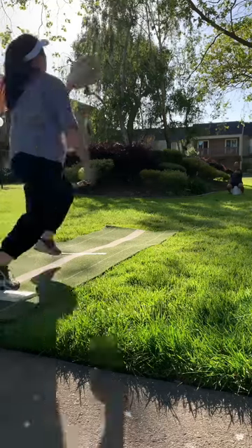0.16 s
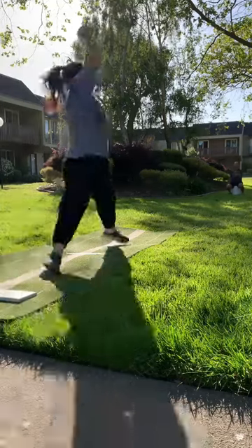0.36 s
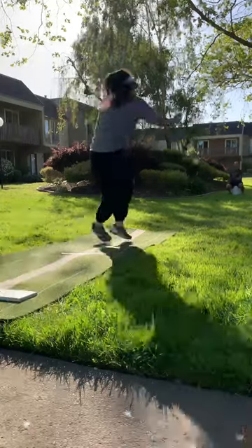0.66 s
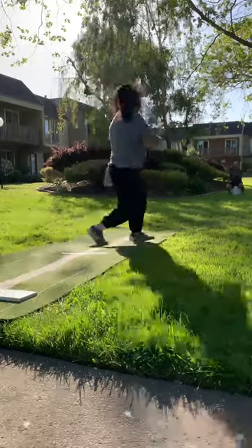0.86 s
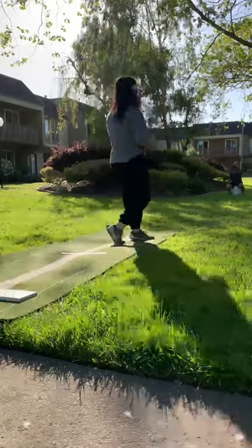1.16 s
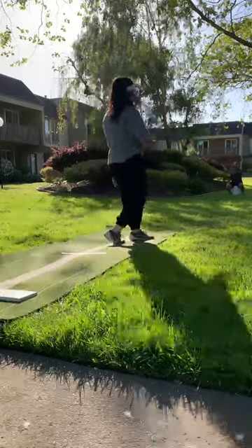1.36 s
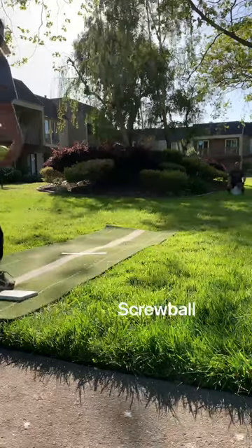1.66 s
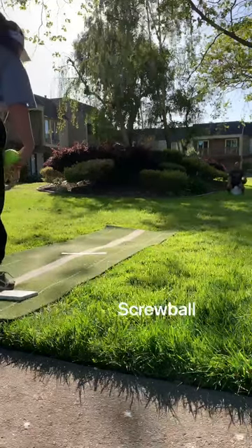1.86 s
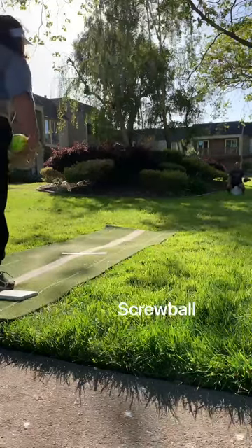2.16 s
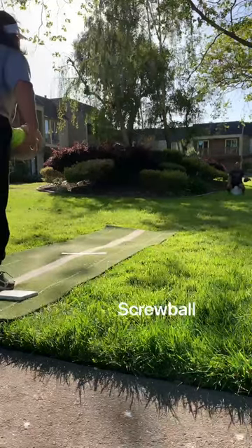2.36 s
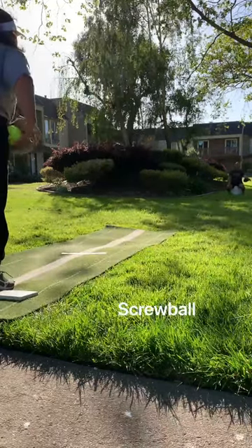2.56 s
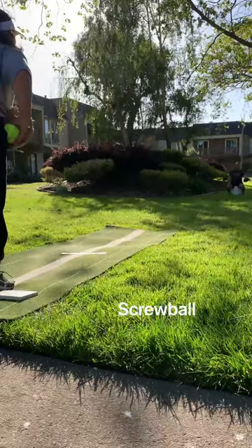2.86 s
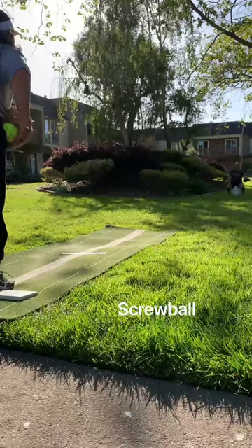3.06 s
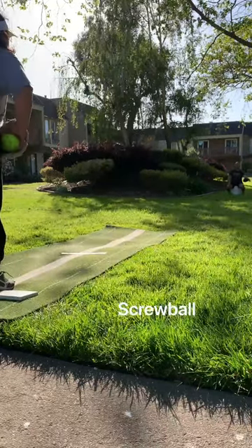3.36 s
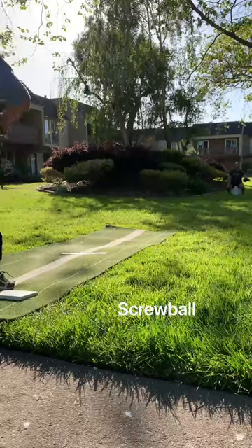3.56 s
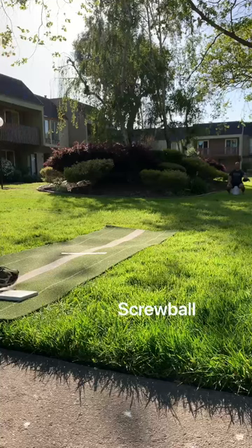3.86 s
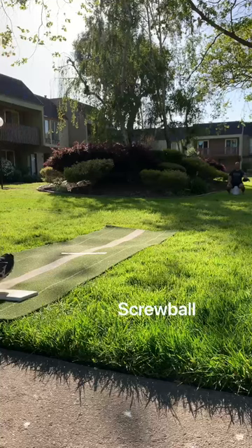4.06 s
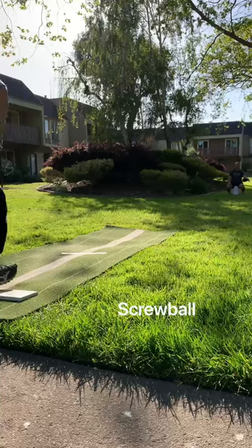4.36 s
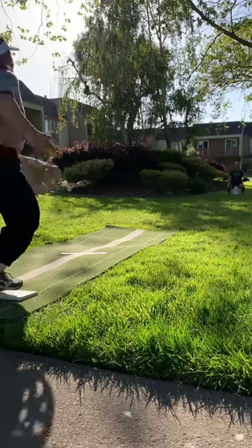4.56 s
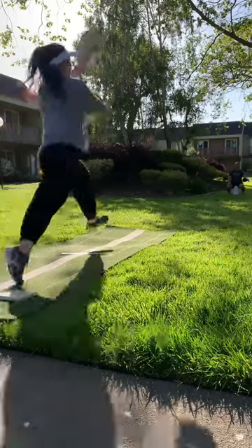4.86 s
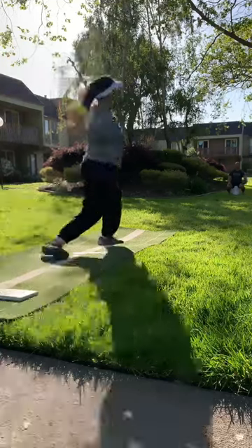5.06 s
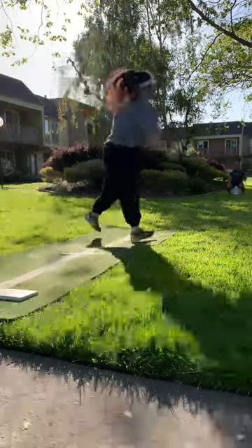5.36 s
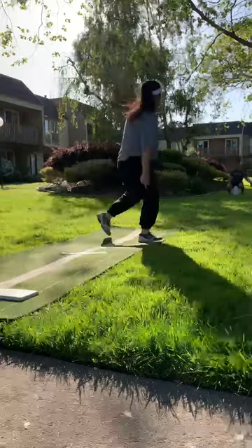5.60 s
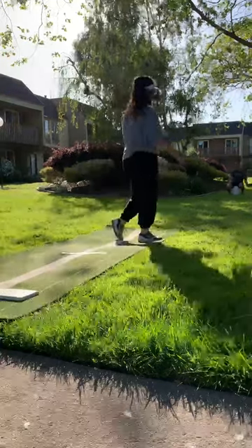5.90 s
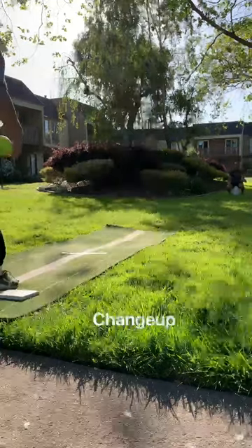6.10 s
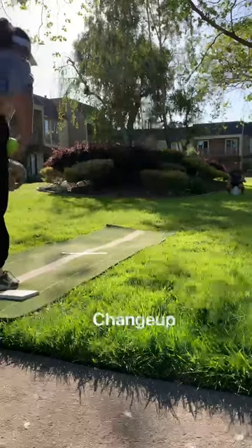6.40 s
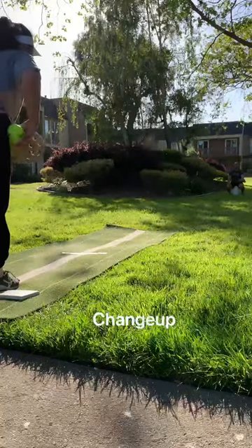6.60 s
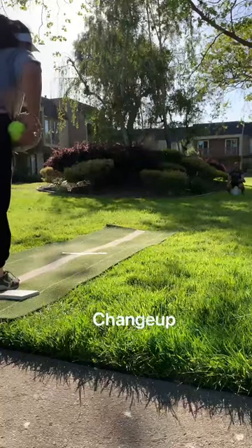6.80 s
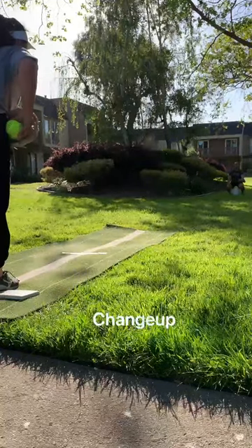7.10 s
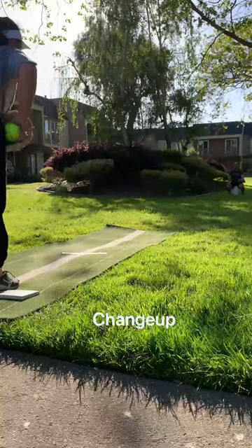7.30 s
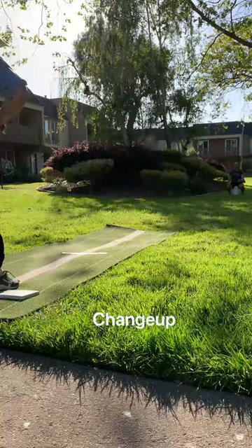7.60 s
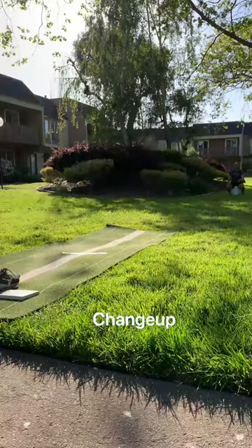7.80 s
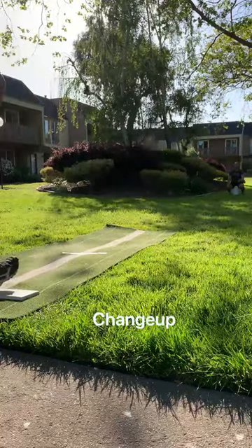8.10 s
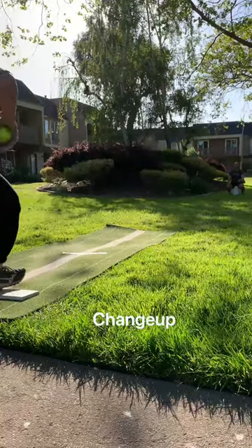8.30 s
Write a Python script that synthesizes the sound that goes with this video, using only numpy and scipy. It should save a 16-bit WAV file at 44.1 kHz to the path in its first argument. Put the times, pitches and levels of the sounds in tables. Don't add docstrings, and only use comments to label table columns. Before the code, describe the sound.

Two softball pitches heard from beside the pitcher. Each has gritty shoe friction on a mat, a fluttery leather-and-cloth slap, then a very loud short pop in a mitt across the yard with a second of scattered echo. Between them come tiny ball and lace crackles over low distant traffic. The ending is quiet: glove rustles, high wavering bird whistles, and a few small sharp ticks just before it stops.

```python
import sys
import numpy as np
from scipy import signal
from scipy.io import wavfile
from scipy.ndimage import uniform_filter1d

SR = 44100
rng = np.random.default_rng(int(sys.argv[2]) if len(sys.argv) > 2 else 0)


def materialize(psi):
    bounded = np.clip(np.atleast_2d(psi).T, -1, 1)
    quanta = np.round(bounded * 32767).astype(np.int16)
    wavfile.write(sys.argv[1], SR, quanta)


def invert_db(level):
    return 10 ** (np.asarray(level, dtype=float) / 20)


N = 372503
TIME = np.arange(N) / SR

SHOTS_S = [0, 1.408, 5.978, 8.5]
# start in seconds, crack level in dB, crack length in ms,
# lateness of the crack's peak (exponent), lag of the air pocket in seconds.
CATCHES = [
    (1.0738, 2.5, 2.7, 1.1, .0032),
    (5.6724, -0.5, 2.5, 2.0, .0031),
]


def rms_one(x):
    return x / np.sqrt(np.mean(x ** 2) + 1e-20)


def at_hz(points, hz):
    curve_hz, values = np.transpose(points)
    return np.interp(np.log(hz), np.log(curve_hz), values)


def drift(rate):
    r = np.exp(-40 * np.pi * rate / SR)
    noise = rng.standard_normal(N // 20 + 2002)
    slow = signal.lfilter([1], [1, -2 * r, r * r], noise)[2000:]
    return np.repeat(rms_one(slow), 20)[:N]


def resonance(x, hz, width_hz):
    r = np.exp(-np.pi * width_hz / SR)
    return signal.lfilter([1, 0, -1], [1, -2 * r * np.cos(2 * np.pi * hz / SR), r * r], x) * (1 - r * r) / 2


def resonance_twice(x, hz, width_hz):
    return resonance(resonance(x, hz, width_hz), hz, width_hz)


def bands(sources, spectrum, order=2):
    edges = 28 * 2 ** np.arange(0, 9.3, .4)
    lowest, highest = spectrum[0][0], spectrum[-1][0]
    inside = [(a, b) for a, b in zip(edges, edges[1:]) if lowest < np.sqrt(a * b) < highest]
    for k, (low, high) in enumerate(inside):
        centre = np.sqrt(low * high)
        sos = signal.butter(order, [low, high], "band", fs=SR, output="sos")
        yield centre, signal.sosfilt(sos, sources[k % 2]) * invert_db(at_hz(spectrum, centre))


def contacts(rows):
    out, t = np.zeros(N + 4000), np.arange(4000) / SR
    for s, peak_db, hz, cycles, ms in rows:
        ms = max(ms, .1)
        burst = rng.standard_normal(4000) * np.exp(-t * 820 / ms) * np.minimum(t * 5e3 / ms + .1, 1)
        rung = resonance_twice(burst, hz, 3.1 * hz / max(cycles, 1))
        click = signal.lfilter(*signal.butter(1, [hz / 2, min(1.1 * hz, 18000)], "band", fs=SR), burst)
        click_share = .3 if hz > 1450 else .07
        hit = rung / np.abs(rung).max() + click_share * click / np.abs(click).max()
        hit = signal.lfilter(*signal.butter(3, min(1.9 * hz, 19000), fs=SR), hit)
        out[round(s * SR):][:4000] += invert_db(peak_db) * hit / np.abs(hit).max()
    return out[:N]


def strokes(rows):
    s, db, rise, fall = np.transpose(rows)[:, :, None]
    coarse = TIME[::32] - s
    away = np.maximum(-coarse / np.maximum(rise, .004), coarse / np.maximum(fall, .004))
    gain = invert_db(db - 20 * away ** 1.36)
    return np.repeat(np.sqrt((gain ** 2).sum(axis=0)), 32)[:N]


def mitt():
    # frequency in Hz, level in dB.
    leather = [
        [(1030, -15.5), (1400, -17), (2050, -5.5), (2500, -0.5), (3400, -9), (4500, -13), (5450, -17.5),
         (7200, -10.5), (8200, -16), (10800, -31.5)],
        [(1060, -24), (2300, -25), (3250, 1), (4100, -4.5), (5400, -5.5), (6900, -9.5), (9000, -20)],
    ]
    # start in seconds, peak in dB, ring in Hz, cycles rung, contact in ms.
    palm = [
        (1.0748, -16.5, 1000, 8.7, 0.6),
        (1.075, -22, 1360, 7.1, 0.85),
        (1.0757, -20, 2400, 5.5, 2.5),
        (1.077, -22.5, 145, 2.2, 8.),
        (5.676, -25.5, 152.9, 2.2, 5.6),
        (5.6746, -22.5, 1090, 4.2, 1.2),
        (5.6752, -22, 3200, 5.5, 2.5),
    ]
    pocket_hz, pocket_db, grit_db = 266, -14, -20
    out, t = contacts(palm), np.arange(1500) / SR
    for (s, crack_db, ms, late_peak, lag), modes in zip(CATCHES, leather):
        share = np.minimum(t * 1e3 / ms, 1)
        contact = np.sin(np.pi * share ** late_peak) ** 2.3
        crack = sum(invert_db(db) * np.sin(2 * np.pi * (hz * t + rng.random())) for hz, db in modes)
        crack = contact * (crack + invert_db(grit_db) * rng.standard_normal(1500))
        late = np.maximum(t - lag, 0)
        turns = pocket_hz * late + .17 * (1 - np.exp(-late / .0015))
        pocket = -np.sin(2 * np.pi * turns) * (late * 300) ** 0.15 * np.exp(-(late * 135) ** 3)
        out[round(s * SR):][:1500] += invert_db(crack_db) * crack / np.abs(crack).max() + invert_db(pocket_db) * pocket
    return out


def thigh_slaps():
    # start in seconds, peak in dB, ring in Hz, cycles rung, contact in ms.
    slap_rows = [(.543, -19.5, 1050, 5.5, 1.1), (.549, -26, 4300, 16, 4.7), (.5528, -17, 2700, 4.1, 1.1),
                 (.55, -24, 8800, 1.5, 4.5), (.5445, -29.5, 9000, 1.5, 6.), (.5675, -28, 6000, 1.5, 3.),
                 (.554, -17.5, 1123, 4.3, 3.7), (.557, -20, 500, 3.3, 6.5), (.566, -20, 1684, 3., 2.4),
                 (.568, -15.5, 330, 2.8, 5.2), (5.124, -29, 4000, 2.63, 30), (5.125, -30, 8000, 1.5, 8.),
                 (5.13, -24.5, 7903, 1.7, 6.), (5.126, -29, 1500, 1.5, 12.), (5.134, -25, 4500, 2.5, 5.),
                 (5.14, -18.5, 3340, 12, 1.3), (5.146, -26, 500, 2.3, 8.), (5.141, -16.5, 1639, 5., 3.1),
                 (5.142, -17.5, 959, 9., 2.5), (5.1475, -18, 940, 5., 2.9), (5.152, -19.5, 110, 1.2, 1.9)]
    return contacts(slap_rows)


def yard(x):
    # frequency in Hz, level in dB per Hz.
    scatter = [(71, -32.5), (120, -7), (177, -5.5), (250, -1.5), (563, -13), (846, -6), (1830, -17),
               (2750, -14.5), (3170, -15.5), (4760, -16.5), (7160, -16.5), (16000, -29)]
    # frequency in Hz, time to die by 60 dB in seconds.
    t60 = [(150, 1.3), (500, 0.94), (1200, 1.4), (3000, 1.1), (6000, 0.72), (8500, .36), (13000, .25)]
    # delay in seconds, dB in first shot, dB in second shot, band in Hz.
    walls = [(.011, 2, 2.5, 299), (0.016, -1.5, -2, 450), (.021, 1.5, -6, 270), (0.0216, -14.5, -4, 902.4),
             (.025, -1.5, -6.5, 1029), (.03, -14, -5.5, 897), (.072, -5, -6, 298), (.14, -7, -11, 250),
             (0.053, -4, 5, 870), (0.065, -1, -10, 2870), (0.068, -8, -0.5, 4500), (0.08, -8, -2, 840),
             (0.102, -7, -9, 990), (.143, -8, -10.5, 1380), (0.198, -16, -34, 1340),
             (0.251, -12.5, -12.5, 1300), (.252, -14.5, -24, 2530)]
    bright_db = [2.5, 1.5]
    t, out = np.arange(SR) / SR, np.zeros(N)
    for shot, (start, end) in enumerate(zip(SHOTS_S[:2], SHOTS_S[1:])):
        white = rng.standard_normal((2, SR))
        tail = 0
        for hz, band in bands(white, scatter, order=4):
            decay_db = -60 * t / at_hz(t60, hz)
            lift_db = bright_db[shot] * (1600 < hz < 5000)
            wander_db = 3 * (hz < 3500) * drift(50)[:SR]
            tail = tail + band * invert_db(decay_db + lift_db + wander_db)
        tail = rms_one(tail) * np.clip(2.5 + t / .03, 0, 1)
        for delay, *level_db, hz in walls:
            late = np.maximum(t - delay, 0) / (.001 + .014 * delay)
            puff = white[0] * late * np.exp(-late)
            echo = resonance_twice(puff, hz, 0.88 * hz)
            echo = signal.lfilter(*signal.butter(2, 2 * hz, fs=SR), echo)
            tail = tail + invert_db(level_db[shot] + 21.5) * echo / np.abs(echo).max()
        inside = (TIME >= start) & (TIME < end)
        out[inside] = signal.fftconvolve(x[inside], tail)[:inside.sum()]
    return out


def friction():
    # peak in seconds, level in dB, rise in seconds, fall in seconds (over 20 dB).
    drags = [
        (.455, -40, 0.045, 0.174),
        (5.07, -40, 0.074, 0.15),
    ]
    pushes = [
        (0.386, -45.5, 0.098, 0.13),
        (4.944, -47.5, 0.064, 0.34),
    ]
    scuffs = [(.005, -58.5, 0.0092, 0.039), (0.256, -51, 0.05, 0.023), (.86, -61.5, 0.053, 0.059),
              (1.03, -62.5, 0.14, 0.26), (1.465, -67, 0.036, 0.046), (3.83, -70, 0.07, 0.11),
              (4.04, -59, 0.011, 0.49), (4.537, -52.5, 0.051, 0.064), (4.577, -52.5, .05, 0.073),
              (4.83, -53.5, 0.041, 0.047), (5.648, -56, .025, 0.15), (8.445, -56, 0.077, .1)]
    landings = [
        (.6, -49, 0.024, 0.17),
        (.72, -60, 0.11, 0.26),
        (4.259, -57, 0.15, 0.18),
        (5.2, -51.5, 0.051, 0.24),
        (5.42, -58.5, .03, 0.14),
        (5.99, -85, 0.0079, 0.48),
    ]
    rustles = [(.13, -65, 0.6, 0.1), (1.55, -69.5, 0.073, 0.51), (1.79, -73.5, .3, 0.045),
               (2.029, -86, 0.099, 0.069), (2.199, -76, 0.5, 0.16), (2.35, -76, .08, .18),
               (3.705, -77, 0.067, 0.26), (4.431, -66, 0.13, 0.088), (4.699, -67, 0.12, 0.27),
               (6.218, -70, 0.15, 0.1), (6.34, -70, .08, 0.12), (3.36, -78, .08, .08), (6.6, -76, .15, .2),
               (7.66, -78.5, 0.14, 0.17), (7.821, -72.5, 0.12, 0.099), (8.39, -80, 0.24, .2)]
    # weight in the lows in dB, sheen in the highs in dB.
    colours = [
        (-3, -10.5),
        (-7, -17),
        (-4.5, -17.5),
        (4.5, -23.5),
        (-0.5, -12.5),
    ]
    # frequency in Hz, level in dB per Hz.
    rasp_spectrum = [(250, -22.5), (330, 2), (700, 1.5), (1200, 2.5), (2000, -1.5), (2900, 0), (3900, -3),
                     (5300, -9.5), (6600, -18.5), (7500, -20), (9500, -23), (15500, -25.5)]
    grains_per_s, uneven_db, clump_db = 19000, 3, 1.1
    kinds = np.array([strokes(rows) for rows in (drags, pushes, scuffs, landings, rustles)])
    weight, sheen = invert_db(np.transpose(colours)) @ kinds
    rasp = kinds.sum(axis=0) + 1e-9
    sizes = invert_db(uneven_db * np.minimum(rng.exponential(1, (2, N)), 5)) * rng.choice([-1, 1], (2, N))
    struck = rng.random((2, N)) < grains_per_s / SR
    grains = sizes * struck * invert_db(clump_db * drift(45)) + 1e-18
    parts = np.zeros((4, N))
    for hz, band in bands(grains, rasp_spectrum):
        parts[np.searchsorted([1500, 3000, 7000], hz)] += band * invert_db(1.5 * drift(14))
    rasp_db = 20 * np.log10(rasp)
    bite = invert_db(.3 * np.maximum(rasp_db + 52.5, -8))
    low, high = rms_one(parts[0]), rms_one(parts[3])
    middle = parts[1] + bite * parts[2]
    middle = middle / np.sqrt(np.mean(parts[1] ** 2) + bite ** 2 * np.mean(parts[2] ** 2))
    return weight * low + rasp * middle + sheen * high


def skim():
    # peak in seconds, level in dB, rise in seconds, fall in seconds (over 20 dB).
    slides = [
        [(.46, -44.5, .06, 0.15), (5.07, -44.5, 0.092, .12)],
        [(.385, -50.5, 0.085, 0.068), (4.95, -51.5, 0.077, 0.11)],
        [(0.43, -51.5, .014, 0.19), (5.03, -54, 0.044, 0.18), (4.59, -60, .02, .02), (2.345, -74, .05, .06),
         (2.14, -70, .02, .04), (4.43, -75, .08, .04)],
    ]
    # resonance in Hz, width in Hz.
    fibres = [
        (3700, 1600),
        (4800, 2200),
        (11000, 8700),
    ]
    out = np.zeros(N)
    for rows, (hz, width_hz) in zip(slides, fibres):
        hiss = rms_one(resonance_twice(rng.standard_normal(N), hz, width_hz))
        out += strokes(rows) * hiss * invert_db(1.3 * drift(30))
    return out


def squeak():
    # time in seconds, level in dB.
    swell = [
        (4.03, -68),
        (4.04, -63),
        (4.1, -52.5),
        (4.18, -62),
        (4.3, -71),
    ]
    # resonance in Hz, width in Hz, level in dB.
    sole = [
        (4500, 1500, -2),
        (8200, 800, -6),
        (1600, 650, -2),
    ]
    s, db = np.transpose(swell)
    noise = rng.standard_normal(N) * invert_db(1.3 * drift(54.6))
    rubber = sum(invert_db(mode_db) * rms_one(resonance_twice(noise, hz, w)) for hz, w, mode_db in sole)
    return invert_db(np.interp(TIME, s, db)) * rubber * (TIME > s[0]) * (TIME < s[-1])


def steps_and_taps():
    # start in seconds, peak in dB, ring in Hz, contact in ms.
    thuds = [
        (0.41, -31, 196, 2.6),
        (0.659, -31.5, 238, 7),
        (0.812, -36, 224, 3.4),
        (2.14, -35.5, 237, 4),
        (4.034, -40, 173, 8.3),
        (4.187, -33, 300, 4.4),
        (5.007, -34.5, 253, 30),
        (5.428, -41, 211, 8.3),
        (6.7, -42.5, 377, 7),
    ]
    # start in seconds, peak in dB, ring in Hz, cycles rung, contact in ms.
    taps = [
        (6.698, -49, 1220, 5.3, 4.4),
        (6.699, -52, 2900, 3.3, 3.8),
        (4.186, -44, 1190, 2.9, 5.5),
        (7.778, -61, 2590, 7.6, 21.6),
        (7.793, -56, 4500, 11, 6.9),
        (7.86, -64, 2900, 7., 21),
    ]
    return contacts([(s, db, hz, 2.8, ms) for s, db, hz, ms in thuds] + taps)


def ticks():
    # start in seconds, peak in dB, ring in Hz, contact in ms.
    tick_rows = [(1.4334, -49, 1600, 1.5), (1.459, -51, 3610, 4.4), (1.788, -52, 1800, 9.8),
                 (1.8844, -66.5, 3800, 3), (2.029, -61.5, 2730, 7.9), (2.1363, -49, 1720, 4.6),
                 (2.27, -62, 2230, 2.9), (2.344, -73, 2600, 16), (2.359, -63, 4330, 9.8),
                 (3.712, -53.5, 2570, 6.1), (3.7938, -55.5, 3670, 8.5), (3.8456, -51.5, 2400, 1.3),
                 (3.885, -57, 2700, 3), (4.525, -32.5, 4230, 1.8), (4.041, -51, 1500, 2.5),
                 (4.531, -38, 2800, 2.5), (4.547, -42, 3800, 2.4), (4.556, -43, 5000, 4.),
                 (4.566, -43, 5500, 2.5), (4.558, -32, 1910, 1.6), (4.644, -47.5, 2700, 2),
                 (4.817, -33, 2360, 1.3), (5.986, -48, 2190, 1.9), (5.996, -54, 3440, 7.9),
                 (6.035, -72, 2380, 2), (6.325, -55, 1735, 12.6), (7.659, -55.5, 1660, 2.3),
                 (7.799, -48.5, 1900, 1.6), (8.289, -59, 2670, 3.95), (8.4173, -34, 4100, 0.85),
                 (8.4268, -39, 1730, 2), (8.4394, -40.5, 4060, 2.2)]
    # start in seconds, peak in dB, ring in Hz.
    snaps = [(1.407, -58.5, 7650), (2.0158, -62, 9700), (2.136, -49, 6400), (2.1929, -60, 9820),
             (2.3394, -68, 13000), (2.1373, -49, 13000), (3.6885, -63.5, 10500), (3.8247, -59, 9600),
             (3.8864, -88, 6040), (4.5112, -39, 6760), (4.512, -44, 11000), (6.7, -60, 12000),
             (4.5846, -43.5, 13200), (5.9731, -68.5, 8400), (5.9956, -50, 8600), (6.1776, -55.5, 9630),
             (7.3694, -69, 9360),
             (1.98, -70, 11000), (2.019, -62, 6000), (2.033, -66, 5500), (2.194, -63, 5500),
                (2.368, -64, 8500), (2.42, -68, 4500), (2.345, -62, 2500), (3.35, -60, 1300),
                (3.69, -66, 5500), (3.701, -64, 5200), (3.701, -66, 12500), (3.708, -60, 1700),
                (3.794, -68, 12000), (3.801, -60, 3800), (3.801, -68, 10000), (3.826, -58, 2200),
                (3.837, -61, 3200), (3.848, -65, 8000), (3.884, -67, 8500), (3.897, -60, 1200),
                (6.505, -66, 3500), (6.547, -65, 3800), (6.72, -64, 3000), (6.735, -66, 3000)]
    cycles, snap_ms = 5, 2.1
    rows = [(s, db, hz, cycles, ms) for s, db, hz, ms in tick_rows]
    return contacts(rows + [(*row, cycles, snap_ms) for row in snaps])


def whistles(calls, sag_hz_per_s, swell_db_per_s, fade_db):
    latest = np.maximum(np.searchsorted([call[0] for call in calls], TIME) - 1, 0)
    start, length, top_hz, rise, db = np.array(calls)[latest].T
    t = np.clip(TIME - start, 0, length)
    drop = np.exp((t - length) / 0.013)
    scoop_hz = 520 * np.maximum(1 - t / rise, 0) ** 2
    hz = top_hz - scoop_hz - sag_hz_per_s * np.maximum(t - rise, 0) - 450 * drop
    level_db = db - 23 * drop - swell_db_per_s * (length - t) - fade_db * (2 * t / length - 1) ** 2
    cut_s = SHOTS_S[2]
    unheard = (start < cut_s) & (start + length > cut_s) & (TIME < cut_s)
    return hz, level_db, (t > 0) & (t < length) & ~unheard


def birds():
    # start in seconds, length in seconds, top in Hz, rise in seconds, final level in dB.
    near_calls = [
        (2.553, 0.45, 7164, 0.1, -58.5),
        (5.75, .33, 7070, 0.11, -64),
        (6.345, .4, 7290, 0.11, -54),
        (6.82, 0.26, 7026, 0.16, -55),
    ]
    far_calls = [
        (1.58, .24, 6900, .08, -81),
        (2.17, .2, 7050, .05, -95),
        (3.31, .24, 6700, .01, -93),
        (3.9, .41, 6920, .13, -74),
    ]
    near = whistles(near_calls, 1400, 33.5, 0)
    far = whistles(far_calls, 150, 0, 11)
    trill_angle = 2 * np.pi * 28 * (TIME - 1.632)
    out = np.zeros(N)
    for (hz, level_db, on), flutter_db, trill_db in ((near, 2.5, 0), (far, 4, 8)):
        trilling = (trill_db > 0) * (TIME < 2.5)
        waver_hz = uniform_filter1d(14 * drift(25) + 30 * drift(82), size=40)
        phase = 2 * np.pi * np.cumsum(hz + 170 * np.sin(trilling * trill_angle) + waver_hz) / SR
        flutter = uniform_filter1d(drift(33) + 0.25 * drift(83), size=40)
        trill = trill_db * trilling * np.cos(trill_angle)
        level = invert_db(level_db + 4 + trill + flutter_db * flutter) * uniform_filter1d(on * 1., 200)
        out += level * (np.sin(phase) + invert_db(-39) * np.sin(2 * phase))
    t = np.arange(SR // 2) / SR
    leaves = rng.standard_normal(len(t)) * invert_db(-60 * t / 0.3) * (t > .004)
    return out + invert_db(-36) * signal.fftconvolve(out, leaves)[:N]


def town():
    # frequency in Hz, level in dB per Hz.
    rumble_spectrum = [(15, -55), (25, -24.5), (47, -5), (75, 1.5), (112, -2.5), (162, -16.5), (188, -15),
                       (227, -16.5), (352, -28.5), (400, -32), (520, -66), (880, -120)]
    air_spectrum = [(150, -26), (250, 3), (373, -2), (444, -4), (674, -10), (845, -10.5), (2360, -32.5),
                    (2570, -33.5), (6820, -38), (8120, -40), (16000, -42)]
    # time in seconds, level in dB.
    traffic = [(0, -67.5), (1.4, -67.5), (1.45, -65.5), (2.0, -71.5), (2.7, -72), (3.45, -68.5),
               (4.3, -66.5), (4.85, -68), (5.97, -65.5), (6.3, -69), (7.0, -70.5), (7.6, -69.5),
               (8.45, -69)]
    # time in seconds, lift in dB, half length in seconds.
    cars = [
        (2.7, 6, .3),
        (3.35, 6, .04),
        (3.45, 6, 0.17),
        (4.3, 6, 0.28),
        (6.197, 3.5, 0.25),
    ]
    shot_rumble_db = np.array([-42, -47, -48.5])
    air_db = np.interp(TIME, *np.transpose(traffic))
    shot = np.searchsorted(SHOTS_S[1:], TIME)
    rumble_db = shot_rumble_db[shot] + 0.49 * (air_db - air_db.mean())
    white = rng.standard_normal((2, N))
    rumble = sum(band * invert_db(1.2 * drift(3)) for hz, band in bands(white, rumble_spectrum))
    tyre_db = 2 + sum(db * np.exp(-((TIME - s) / half) ** 2) for s, db, half in cars)
    gust_db = .8 * drift(0.99)
    air, hiss = 0, 0
    for hz, band in bands(white[::-1], air_spectrum):
        if hz < 2600:
            air = air + band * invert_db(gust_db + 2.2 * drift(6) + tyre_db * (850 < hz < 1700))
        else:
            hiss = hiss + band * invert_db(1.1 * drift(5))
    return invert_db(rumble_db + 0.5) * rms_one(rumble) + invert_db(air_db + 4) * rms_one(air) + invert_db(-81.5) * rms_one(hiss)


def scene():
    slaps = thigh_slaps()
    blows = np.zeros(N)
    blows[[round(row[0] * SR) for row in CATCHES]] = invert_db([-46.5, -47.5])
    echoes = yard(blows + invert_db(-63.5) * np.diff(slaps, prepend=0))
    pitcher = slaps + ticks() + steps_and_taps() + friction() + skim() + squeak()
    return (mitt() + echoes + pitcher + birds() + town())[None]


def top_cut(x):
    return signal.sosfilt(signal.butter(12, 16870, fs=SR, output="sos"), x)


def record(dry):
    x = signal.sosfilt(signal.butter(2, 30, "high", fs=SR, output="sos"), dry)
    x = x / (1 + (np.abs(x) / .9) ** 6) ** (1 / 6)
    x = signal.sosfilt(signal.cheby2(8, 40, 16300, fs=SR, output="sos"), x)
    return top_cut(x)


dry = scene()
out = record(dry)
materialize(out)
```